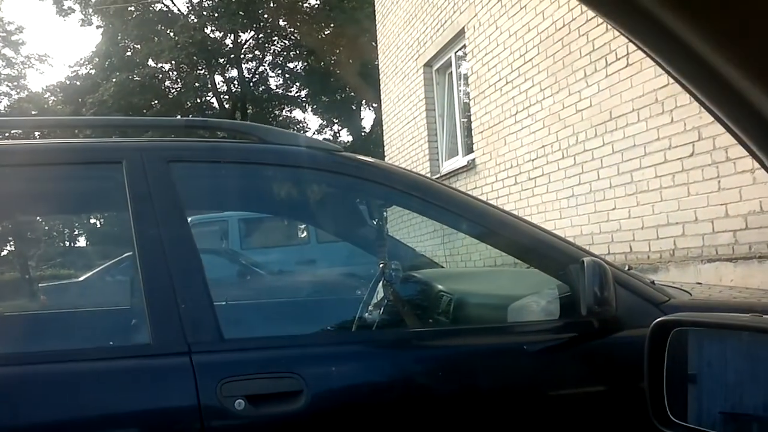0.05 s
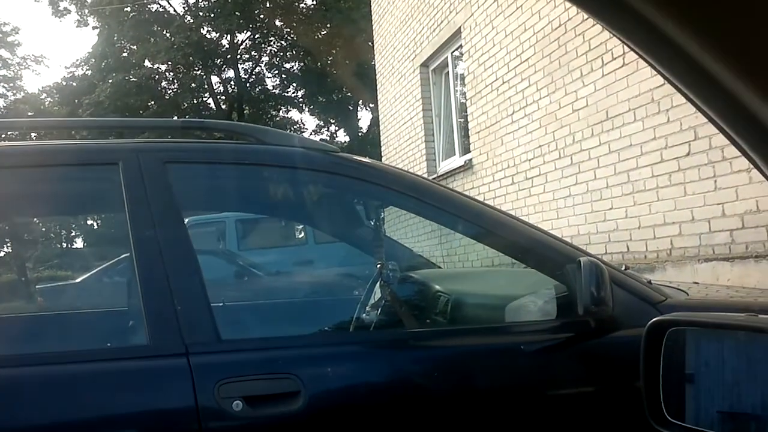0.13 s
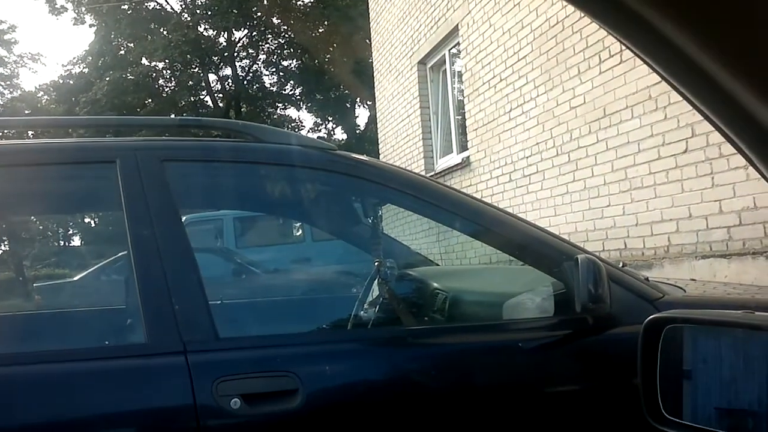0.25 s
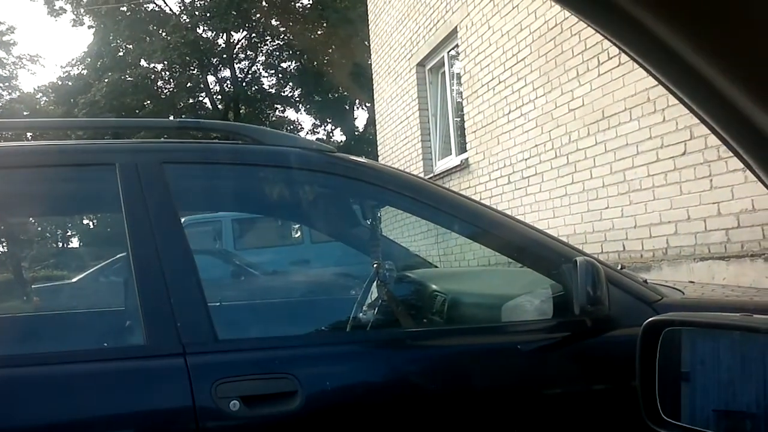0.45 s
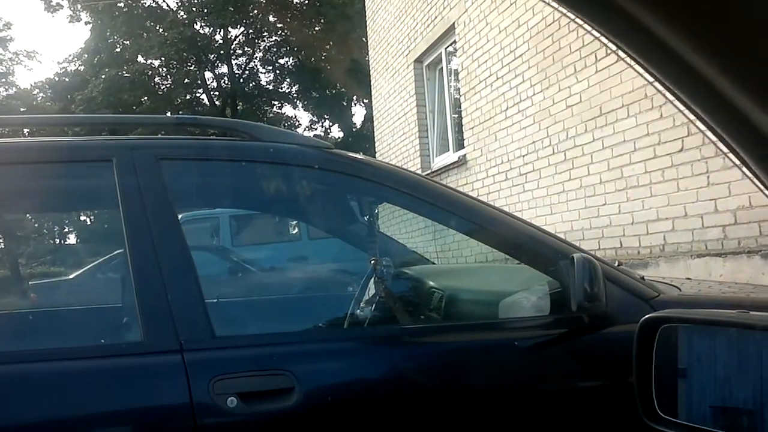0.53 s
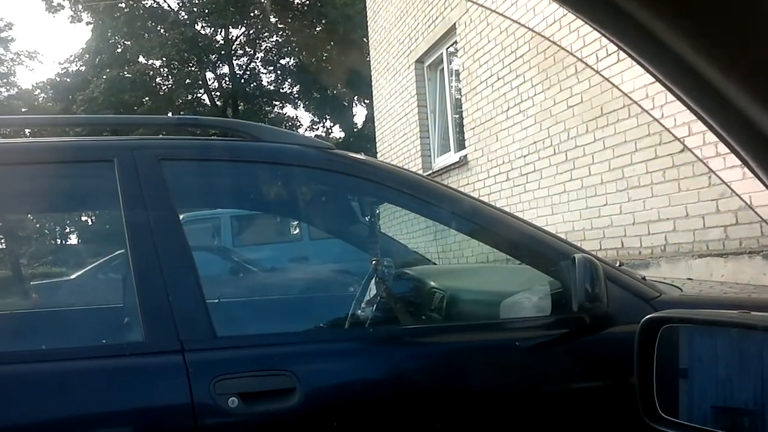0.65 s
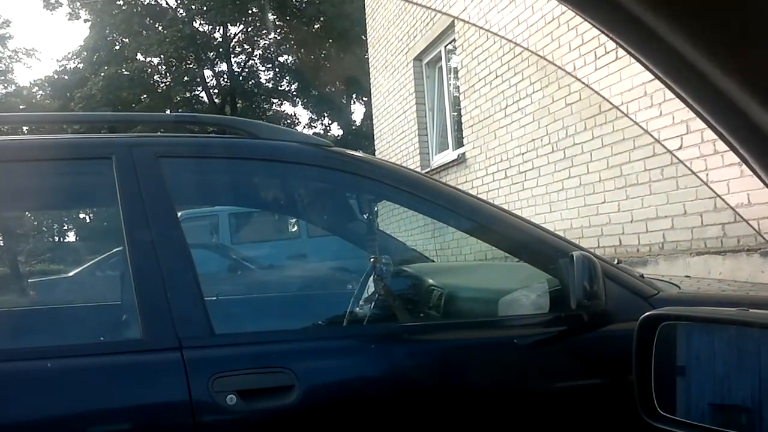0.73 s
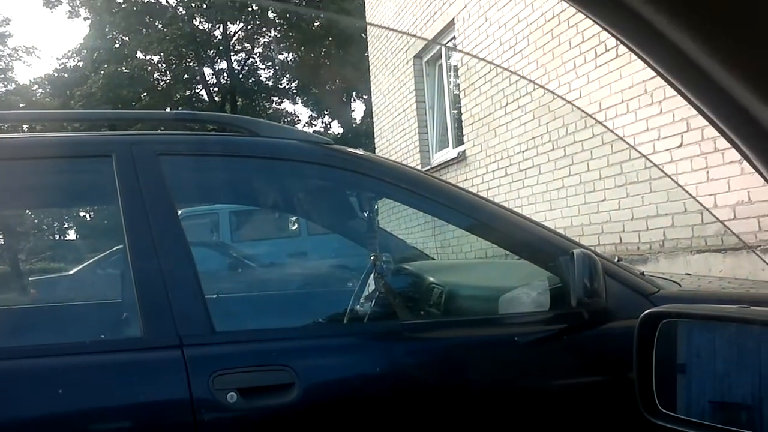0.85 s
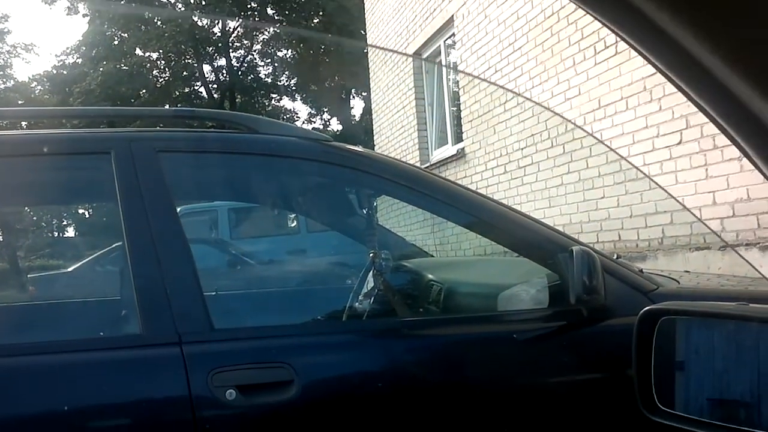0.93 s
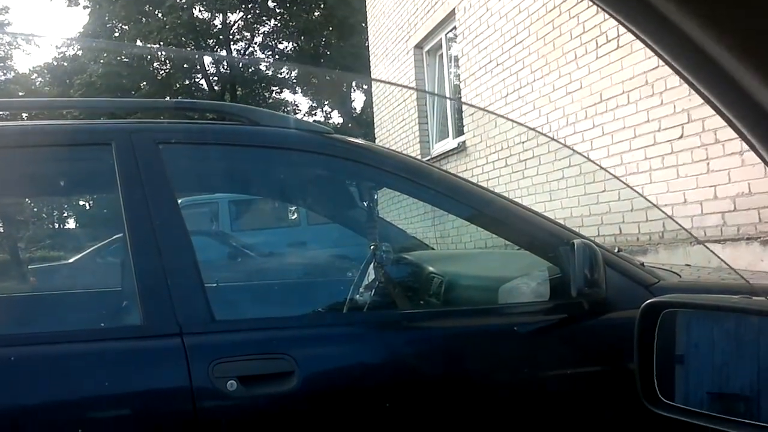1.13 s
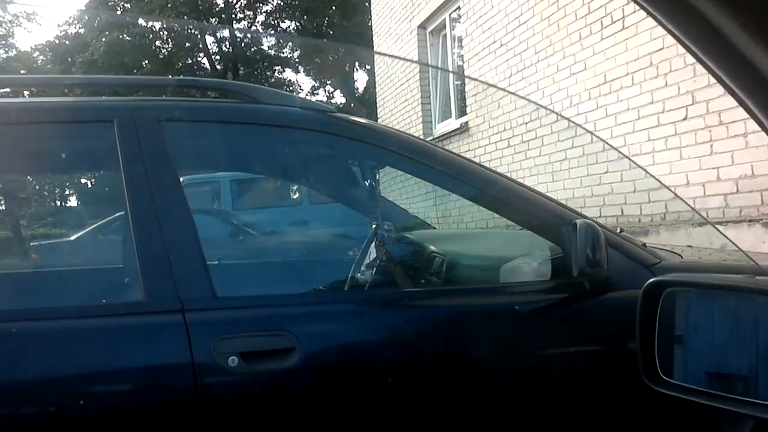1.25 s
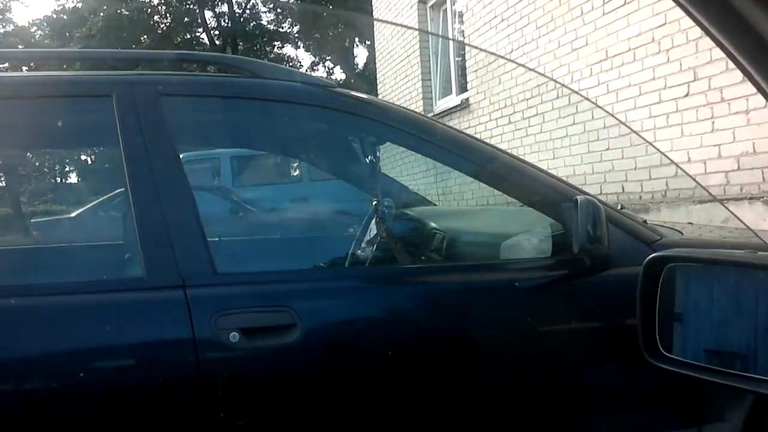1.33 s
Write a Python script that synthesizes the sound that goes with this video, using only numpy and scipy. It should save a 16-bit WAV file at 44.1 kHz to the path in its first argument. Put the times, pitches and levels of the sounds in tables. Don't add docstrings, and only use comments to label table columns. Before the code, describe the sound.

A car's power window motor whirs for under a second after a switch click and a heavy door knock, glass rubbing along rubber seals, then stops with a dull clunk; close phone microphone inside a quiet parked car.

```python
import sys
import numpy as np
from scipy import signal
from scipy.fft import rfft, irfft
from scipy.io import wavfile
from scipy.ndimage import uniform_filter1d

SR = 44100
rng = np.random.default_rng(int(sys.argv[2]) if len(sys.argv) > 2 else 0)


def wav_out(sig):
    wavfile.write(sys.argv[1], SR, np.round(np.clip(np.atleast_2d(sig).T, -1, 1) * 32767).astype(np.int16))


def magnitude_from_level(level_db):
    exponent = np.asarray(level_db, float) / 20
    return 10 ** exponent


N = 61739
T = np.arange(N) / SR


def level(x, db):
    return x * magnitude_from_level(db) / np.sqrt(np.mean(x ** 2))


def curve(rows):
    return magnitude_from_level(np.interp(T, *np.array(rows).T))


def colour(x, rows):
    hz, db = np.array(rows).T
    bins_hz = np.arange(N // 2 + 1) * SR / N
    gain = magnitude_from_level(np.interp(np.log(bins_hz + 1), np.log(hz), db))
    return irfft(rfft(x) * gain, N)


def band(hz, spread, x=None):
    sos = signal.butter(2, [hz / spread, hz * spread], "band", fs=SR, output="sos")
    x = rng.standard_normal(N) if x is None else x
    return signal.sosfilt(sos, x) / np.sqrt(2 * hz * (spread - 1 / spread) / SR)


def lowpass(x, order, hz):
    return signal.sosfilt(signal.butter(order, hz, fs=SR, output="sos"), x)


def ring(x, modes):
    out = 0
    for k, (hz, db, t60) in enumerate(modes):
        pole = np.exp(2j * np.pi * hz / SR - np.log(1000) / (t60 * SR))
        out = out + (-1) ** k * magnitude_from_level(db) * signal.lfilter([1], [1, -pole], x).imag
    return out


def walk(rate_hz):
    k = int(SR / rate_hz)
    drift = uniform_filter1d(uniform_filter1d(rng.standard_normal(N), k), k)
    return drift / drift.std()


def burst(start_s, fall_ms, rise_ms=1):
    since_ms = np.maximum(T - start_s, 0) * 1000
    fall = np.exp(-np.maximum(since_ms - rise_ms, 0) / fall_ms)
    return np.minimum(since_ms / rise_ms, 1) * fall


# freq_hz, level_db (per Hz)
STREET_SPECTRUM = [(20, 0), (70, -12.5), (200, -19), (600, -30), (1350, -23.5), (2200, -49.5), (4000, -48)]
# time_s, level_db
STREET_SWELL = [(0, 2.5), (.07, 1.5), (.17, -7.5), (1.2, -0.5), (1.3, 3), (1.4, 0.5)]
# time_s, level_db
FAR_WHINE = [(0, -99), (.16, -77), (1.12, -74.5), (1.2, -78), (1.3, -78.5), (1.33, -71), (1.4, -79.5)]


def street():
    whine_hz, noise_db = 2390, -65.5
    whine = band(whine_hz, 1.02) + .5 * band(whine_hz + 230, 1.03)
    noise = colour(rng.standard_normal(N), [*STREET_SPECTRUM, (9000, -87.5)])
    return level(noise, noise_db) * curve(STREET_SWELL) + whine * curve(FAR_WHINE)


# start_s, level_db, rise_ms, fall_ms, centre_hz
FINGER = [
    (0.07, -60, 6, 18, 1060),
    (0.071, -56, 2.6, 25, 520),
    (0.184, -52.5, 1.02, 6.8, 7360),
    (0.184, -51.5, 1, 8.8, 10640),
]
# start_s, level_db, rise_ms, fall_ms, centre_hz
SCRAPES = [ (0.195, -59, 5.6, 11, 5570), (0.184, -46, 0.79, 17, 3230), (0.215, -49.5, 8.5, 42, 1400),
           (0.219, -49.5, 4.2, 8.3, 4850), (0.226, -47.5, 2.9, 28, 622), (0.266, -34.5, 3, 33, 2330),
           (0.266, -31, 6, 8.8, 1336), (0.274, -50.5, 1, 11, 7100), (0.276, -38, 4.6, 16, 4240),
           (0.296, -25, 1.7, 22, 1140), (0.301, -36.5, 5.6, 12, 3530), (0.302, -48, 10, 5.1, 6100),
           (0.339, -40, 14, 15.3, 1840), (0.345, -48, 14, 5.5, 3610), (.392, -35.5, .6, 11, 1800),
           (0.391, -35.5, .6, 7.4, 1030), (.391, -48, 1.7, 54, 3260), (0.392, -55, 2, 22, 7050),
           (0.418, -50.5, 3.4, 9.3, 3700), (.579, -49, 1, 18, 1220), (0.693, -39.5, 1.1, 8, 1280),
           (0.695, -46, 1, 19, 2500), (1.045, -56, 2.1, 23, 4300), (1.05, -46.5, 7.2, 13.4, 1670)]


def scrapes():
    rasps = sum(magnitude_from_level(db) * band(hz, 1.327) * burst(s, fall, rise)
                for s, db, rise, fall, hz in [*FINGER, *SCRAPES])
    return lowpass(rasps, 2, 9000)


# freq_hz, level_db, t60_s
PLASTIC = [(560, -8, .03), (2490, -7, .02), (2660, 0, .022), (2850, -2, .018), (3060, -4, .015),
           (3360, -4, .018), (3940, -5, .018), (4775, -14, .012), (5400, -12, .012), (7700, -12, .01)]
# start_s, level_db
CLICKS = [
    (0.1813, -31.5),
    (0.198, -36),
]


def switch():
    tick_ms, rattle_ms = 0.42, 23.6
    hits = sum(magnitude_from_level(db) * rng.standard_normal(N) * (burst(s, tick_ms) + 0.43 * burst(s, rattle_ms))
               for s, db in CLICKS)
    return magnitude_from_level(-21.5) * ring(hits, PLASTIC)


# freq_hz, level_db, t60_s
DOOR = [(31, -3, 0.47), (60.3, -4, 0.14), (79.5, -3.5, 0.31), (122, 3.5, 0.11), (166.4, 1, 0.19),
        (195.3, -2, .2), (249.7, -5, 0.14), (360.3, 2, 0.049), (452, 0, 0.066), (517, 5.5, 0.023),
        (690, -4, 0.039), (808, -6.5, 0.051), (1060, -0.5, 0.037), (1283, -0.5, 0.038)]
# start_s, level_db, contact_hz, chatter_ms
JOLTS = [(0.072, -49.5, 200, 8), (0.083, -38.5, 176, 18.6), (.11, -67, 106, 8.4), (0.124, -48, 44.8, 3.5),
         (.228, -29, 300, 9.4), (0.253, -20.5, 268, 12), (0.2937, -4, 800, 9.2), (0.31, -13, 480, 25),
         (0.342, -19, 500, 26), (0.361, -22.5, 306, 11), (0.394, -19.5, 495, 11.5), (0.471, -28, 34.6, 44),
         (0.522, -45, 141, 11), (0.578, -27, 690, 7), (.63, -32.5, 138, 24), (.694, -26, 300, 6.8),
         (1.047, -23.5, 613, 10.7), (1.096, -35, 184, 15), (1.109, -49.5, 448, 42),
         (1.119, -33.5, 121.6, 3.7), (1.134, -39, 41.6, 6.9)]
# time_s, level_db
SHAKE = [(.222, -82), (.25, -46), (.31, -32.5), (.42, -33), (.54, -39), (.66, -43.5), (1.05, -45.5),
         (1.15, -41), (1.24, -71)]
# start_s, level_db, rise_ms, fall_ms, pitch_hz
SHUDDER = [(.078, -35, 16.2, 9.2, 188.5), (0.11, -38, 25, 8.9, 38), (.267, -26, 4.1, 5.7, 2493),
           (1.05, -34, 19.8, 9.8, 563), (1.048, -39.5, 9.3, 10.3, 667), (1.046, -44, 7, 12, 1816),
           (0.079, -38, 10, 31, 120), (.2945, -26.5, 1.5, 4.9, 960), (.295, -20, 2, 8, 790),
           (.296, -26.5, 0.96, 5.4, 1600), (1.13, -45.5, 17, 35, 108.3), (1.2, -55, 31, 18, 95.5),
           (1.101, -38, 27.6, 12, 220), (1.6, -33, 36, 12, 44.3),
           (.2285, -24.5, 12, 30, 124), (.238, -29, 8, 25, 195), (.2765, -26, 8, 12, 118),
          (.28, -22.5, 22, 30, 52), (.29, -25, 15, 20, 78), (.2917, -15, 6, 8, 215),
          (.295, -17.5, 17, 12, 115), (.2973, -13, 5, 14, 365), (.302, -18.5, 12, 30, 195),
          (.352, -23, 18, 20, 75), (.3634, -18.5, 14, 25, 116), (.3735, -17.5, 7, 18, 190),
          (.385, -26, 30, 80, 33), (.485, -30, 25, 15, 128), (.49, -32, 20, 20, 78)]


def door():
    blow = 12.9
    push = 0
    for s, db, hz, chatter_ms in JOLTS:
        contact = rng.standard_normal(N) * burst(s, chatter_ms)
        contact[int(s * SR)] = -blow
        push = push + magnitude_from_level(db) * band(hz, 1.815, contact)
    rumble = lowpass(rng.standard_normal(N), 2, 90)
    shaking = level(ring(rumble, DOOR), 0) * curve(SHAKE)
    notes = 0
    for s, db, rise, fall, hz in SHUDDER:
        unsteady = magnitude_from_level(db + 2 * walk(200))
        notes = notes + unsteady * np.sin(2 * np.pi * hz * (T - s)) * burst(s, fall, rise)
    return magnitude_from_level(-51.5) * ring(push, DOOR) + shaking + notes


# freq_hz, level_db (per Hz)
SEAL = [(88, -1), (150, 6.5), (330, -5), (600, -9), (893, -15.5), (1550, -18.5), (1840, -18.5), (7480, -32),
        (14000, -63.5)]
# time_s, level_db
DRAG = [(.205, -45), (.225, -20), (.262, -18), (.3, -2), (.385, -6), (.4, 5), (.5, 1.5), (.72, 0),
        (1.073, -1.5), (1.098, -28)]


def seals():
    grit_per_s, grit_db = 1500, 2.5
    drag_db, patchy_db = -41, .8
    hits = rng.random(N) < grit_per_s / SR
    grit = hits * rng.standard_normal(N) * magnitude_from_level(grit_db * rng.exponential(size=N))
    rub = colour(level(grit, -6.0) + rng.standard_normal(N), SEAL)
    return level(rub, 0) * curve(DRAG) * magnitude_from_level(drag_db + patchy_db * walk(90))


# multiple (of shaft rate), level_db
SHAFT = [(1, 3), (2, -5), (3, -12), (4, -18), (5, -19), (6, -22), (7, -24), (8, -24), (10, -26), (11, -26),
         (12, -12.5), (13, -17), (14, -17), (16, -24), (23, -28), (24, -19.5), (25, -29), (33, -29),
         (35, -33)]
# time_s, level_db
WHINE = [(.3, -2), (.42, 3), (.5, 2), (.6, -1.5), (.7, -2), (.84, 3), (.96, -1), (1.07, -1)]
# centre_hz, spread (ratio), level_db
HOUSING = [(898, 1.12, -25.5), (1915, 1.05, -32.5), (2518, 1.06, -31.5), (4480, 1.1, -29.5)]


def motor():
    run_hz, wander, flutter_db = 75.2, .0025, 1.4
    start_s, spinup_s, stop_s, coast_s = .222, .072, 1.068, 0.0069
    on_s = np.maximum(T - start_s, 0)
    stopping = np.exp(-(np.maximum(T - stop_s, 0) / coast_s) ** 2)
    turn_hz = run_hz * (1 - np.exp(-on_s / spinup_s)) * (1 + wander * walk(25))
    phase = 2 * np.pi * np.cumsum(turn_hz) / SR
    whine = curve(WHINE)
    brushes = sum(magnitude_from_level(db) * band(hz, spread) for hz, spread, db in HOUSING)
    out = brushes * (1 + .5 * np.cos(phase)) * np.sqrt(whine)
    for order, db in SHAFT:
        order = round(order)
        commutator = order > 9
        offset = rng.uniform(0, 6.5) if commutator else 0
        flutter = flutter_db * min(order / 3, 1.5) * walk(5.7)
        line = magnitude_from_level(db + flutter) * np.cos(order * phase + offset)
        out = out + line * (whine if commutator else 1)
    return magnitude_from_level(-36.5) * out * stopping * np.minimum(on_s / 0.038, 1)


def scene():
    return (street() + scrapes() + switch() + door() + seals() + motor())[None]


def low_pass(x):
    return signal.sosfilt(signal.butter(12, 15730, fs=SR, output="sos"), x)


def record(dry):
    hiss_db, hiss_top_hz = -72.5, 9000
    duck_db, duck_hz = -6, 11000
    hiss = level(lowpass(rng.standard_normal(N), 1, hiss_top_hz), hiss_db)
    loud = np.clip(uniform_filter1d(np.abs(dry[0]), size=2048) / magnitude_from_level(-42), 0, 1)
    top = signal.sosfiltfilt(signal.butter(4, duck_hz, "high", fs=SR, output="sos"), hiss)
    hiss = hiss - top * (1 - magnitude_from_level(duck_db * loud))
    mic = signal.sosfilt(signal.butter(2, 22, "high", fs=SR, output="sos"), dry + hiss)
    return low_pass(mic)


dry = scene()
out = record(dry)
wav_out(out)
```